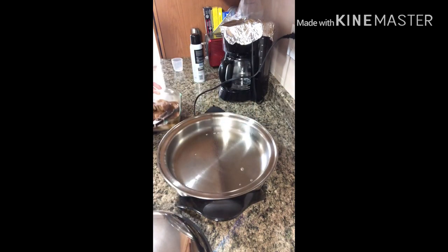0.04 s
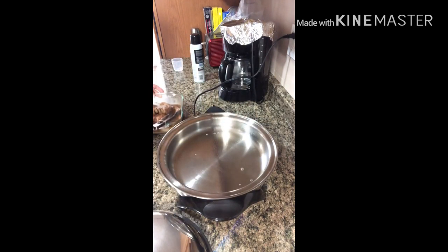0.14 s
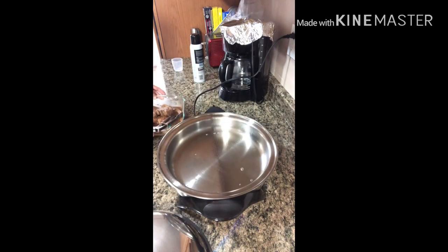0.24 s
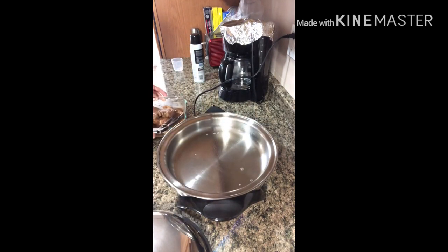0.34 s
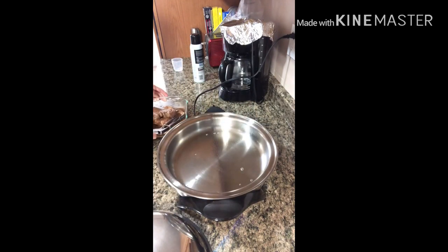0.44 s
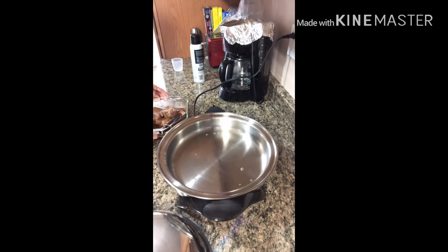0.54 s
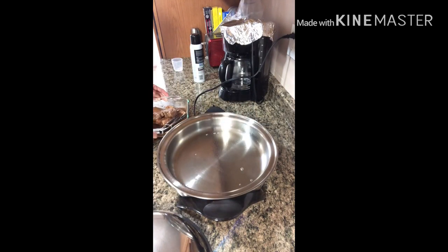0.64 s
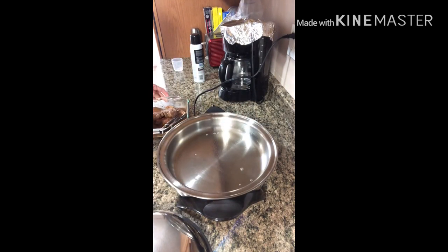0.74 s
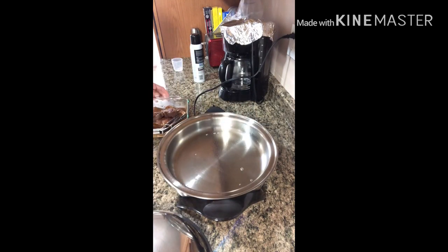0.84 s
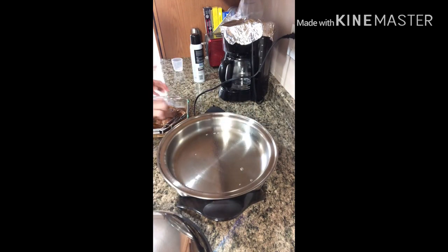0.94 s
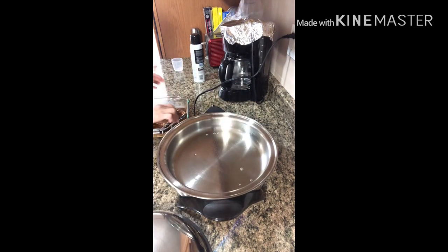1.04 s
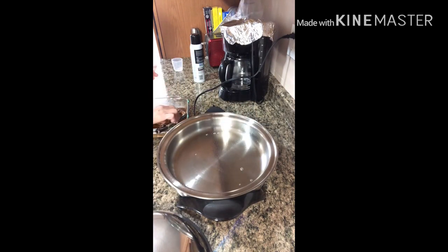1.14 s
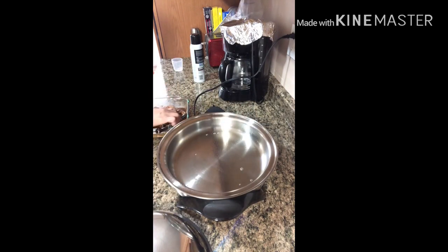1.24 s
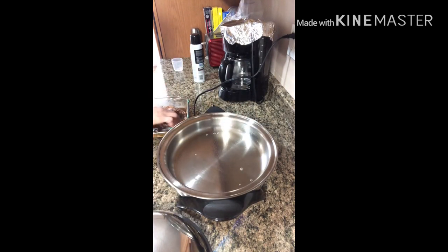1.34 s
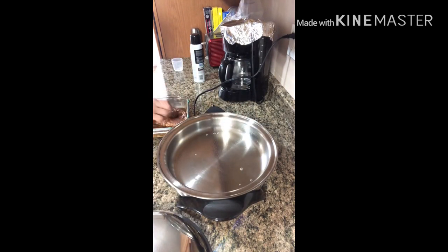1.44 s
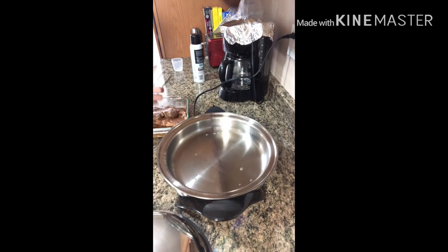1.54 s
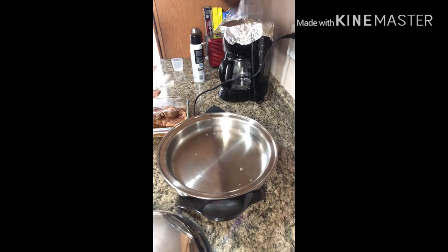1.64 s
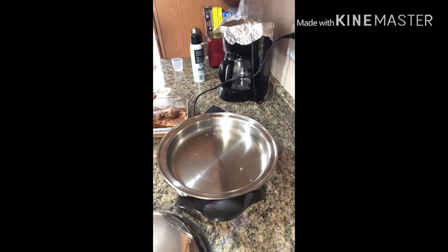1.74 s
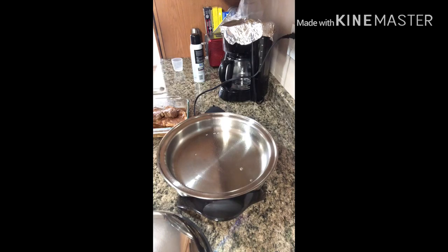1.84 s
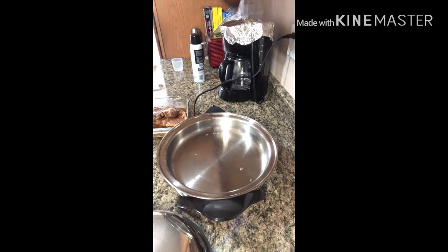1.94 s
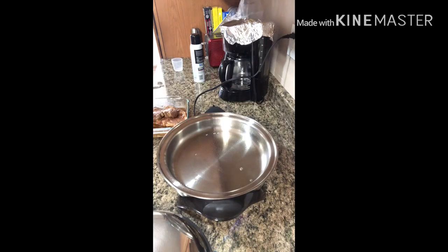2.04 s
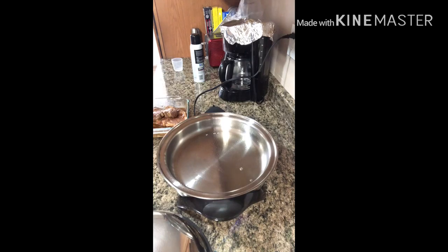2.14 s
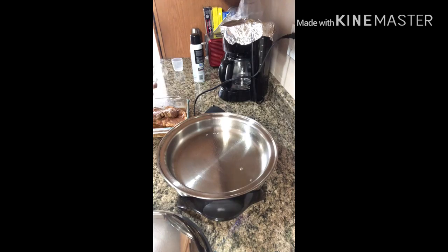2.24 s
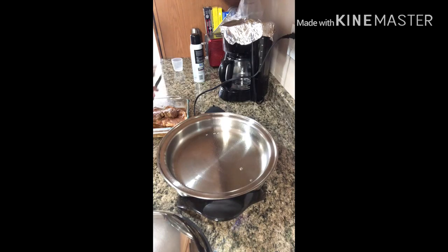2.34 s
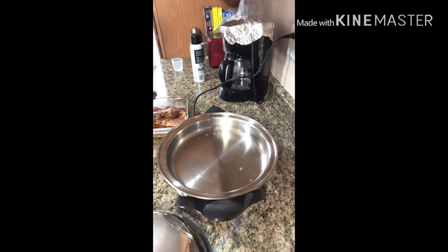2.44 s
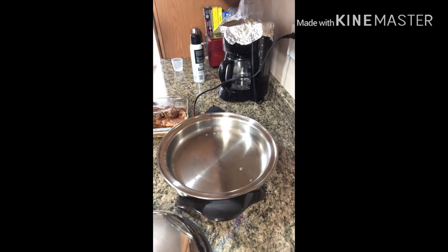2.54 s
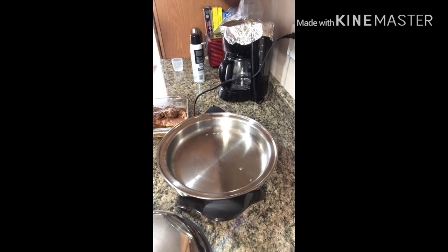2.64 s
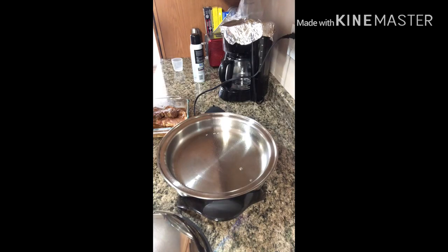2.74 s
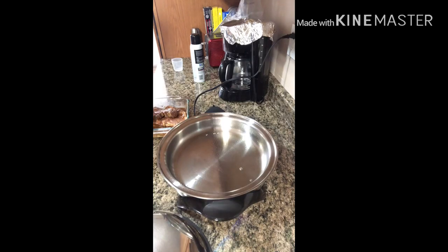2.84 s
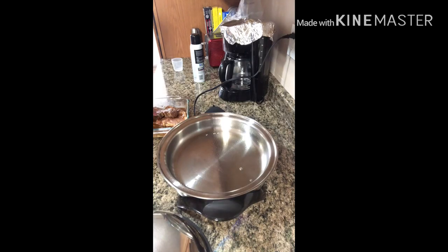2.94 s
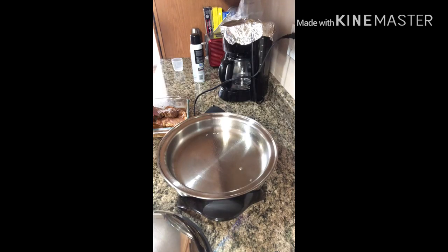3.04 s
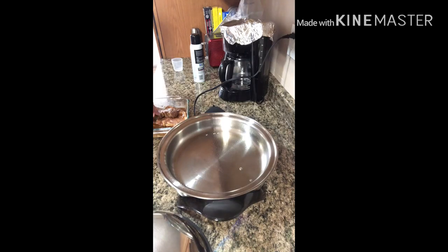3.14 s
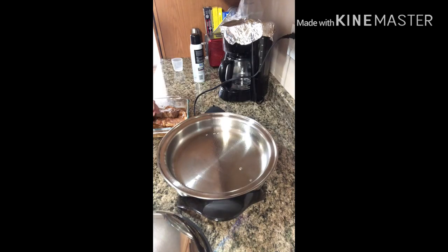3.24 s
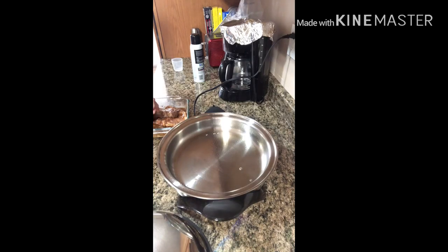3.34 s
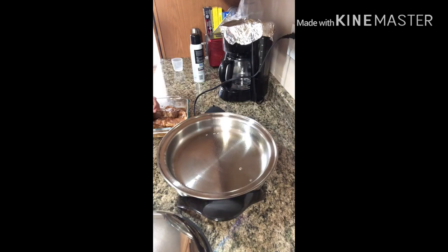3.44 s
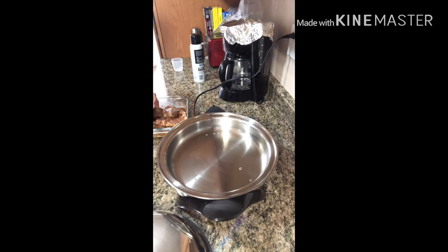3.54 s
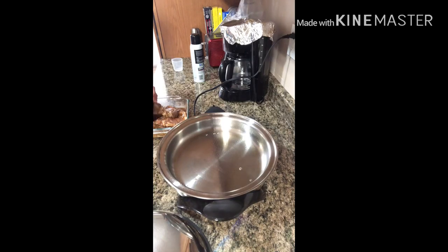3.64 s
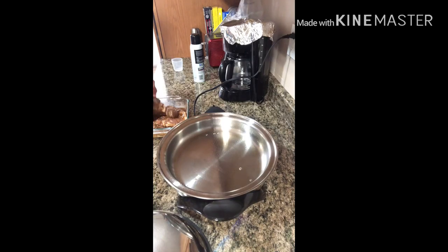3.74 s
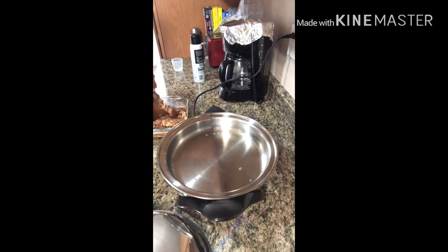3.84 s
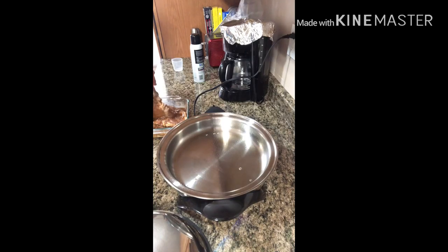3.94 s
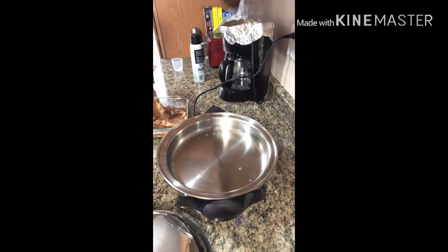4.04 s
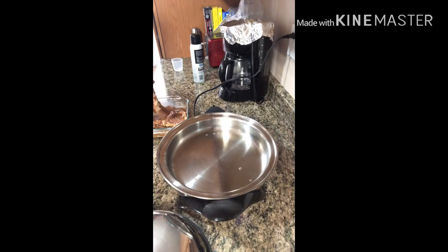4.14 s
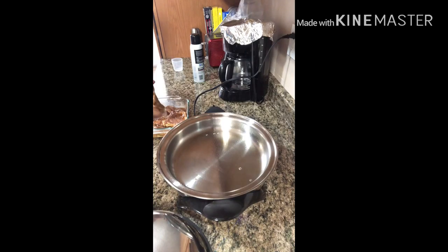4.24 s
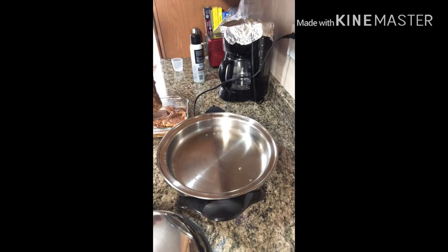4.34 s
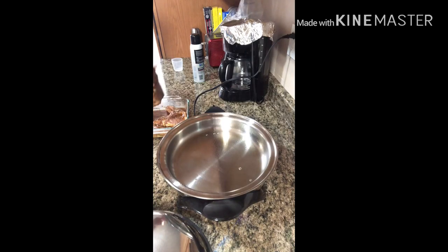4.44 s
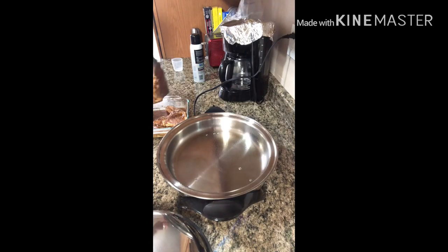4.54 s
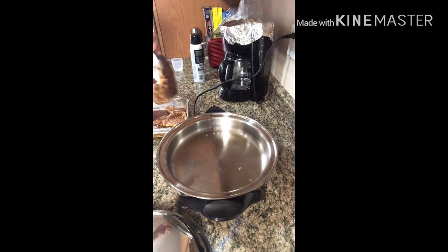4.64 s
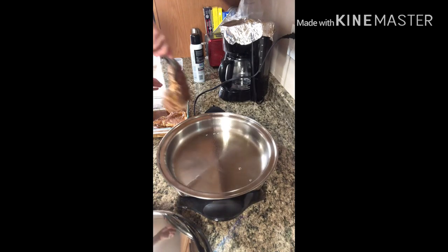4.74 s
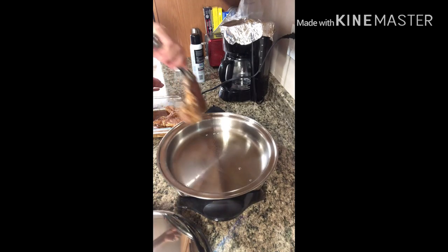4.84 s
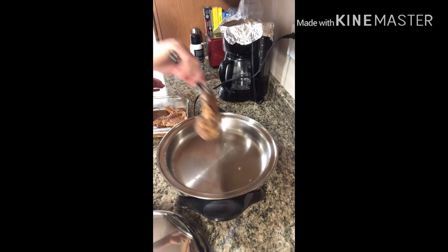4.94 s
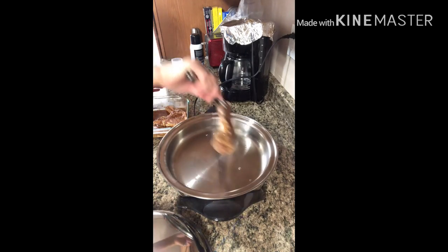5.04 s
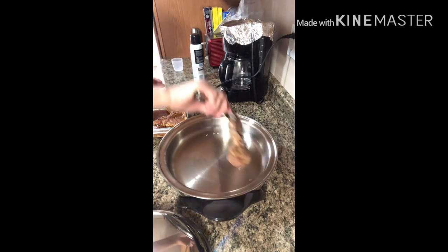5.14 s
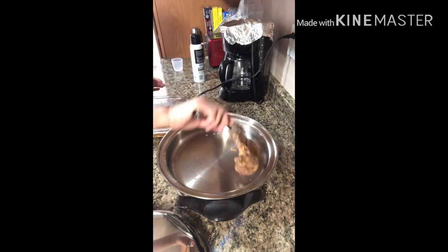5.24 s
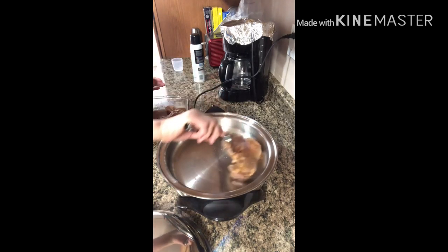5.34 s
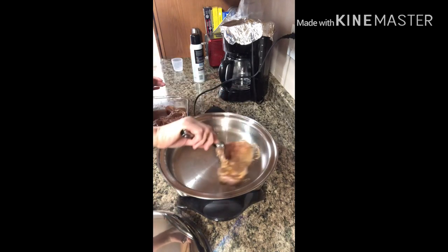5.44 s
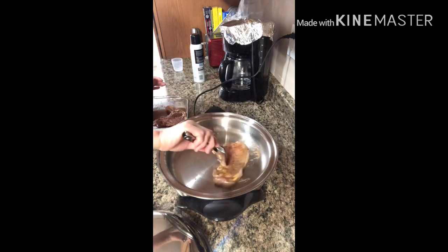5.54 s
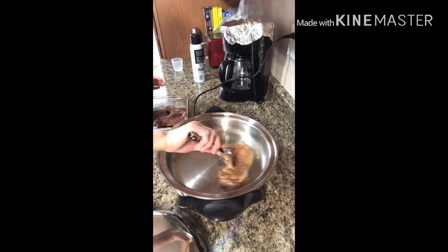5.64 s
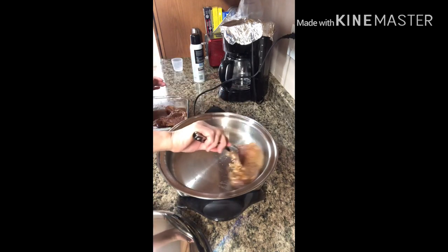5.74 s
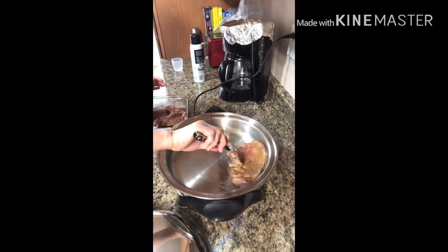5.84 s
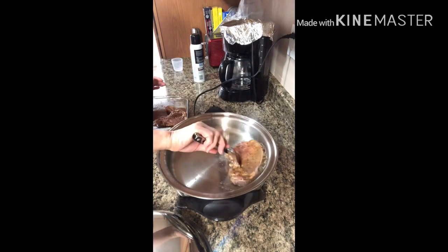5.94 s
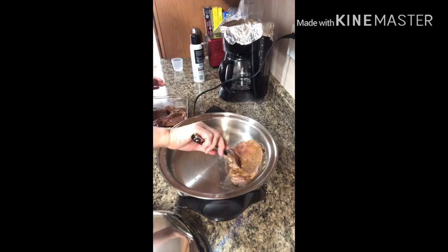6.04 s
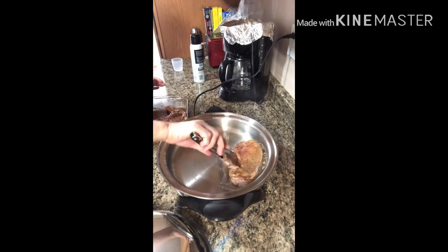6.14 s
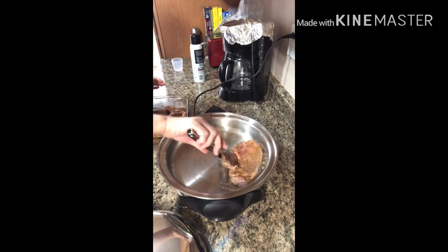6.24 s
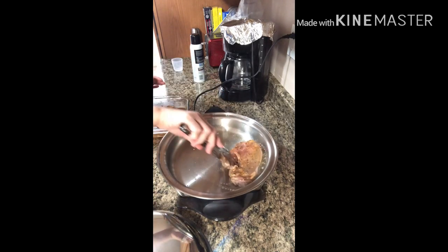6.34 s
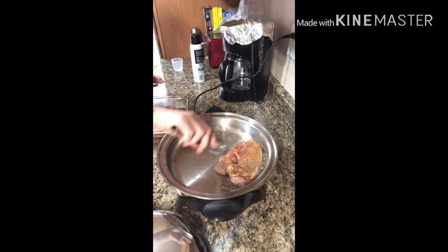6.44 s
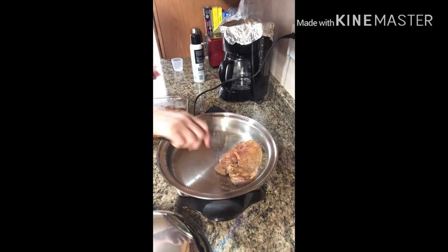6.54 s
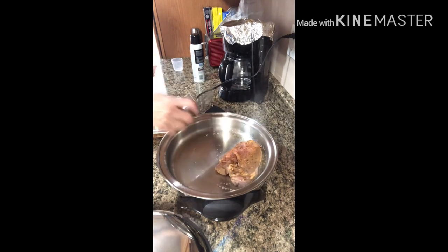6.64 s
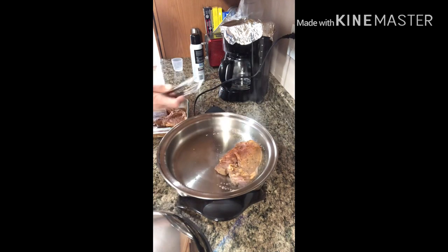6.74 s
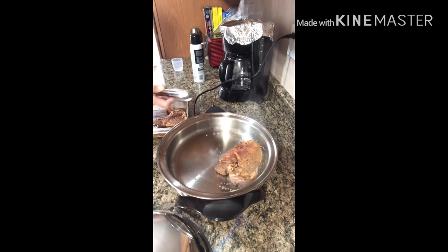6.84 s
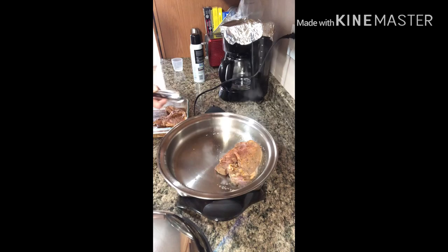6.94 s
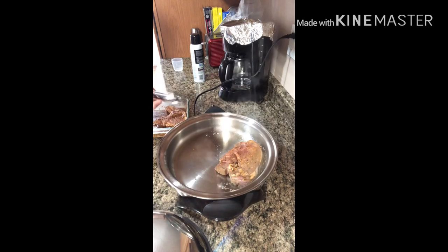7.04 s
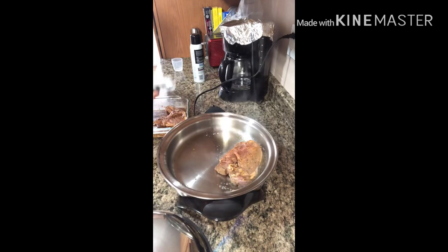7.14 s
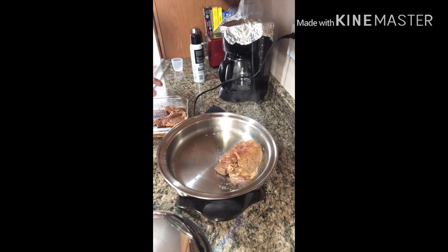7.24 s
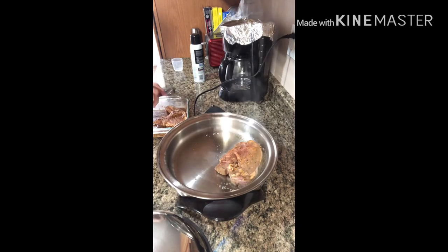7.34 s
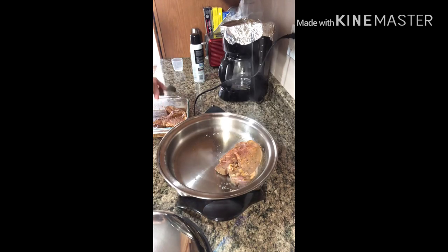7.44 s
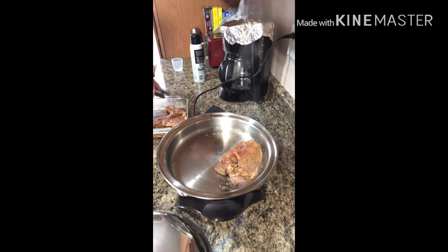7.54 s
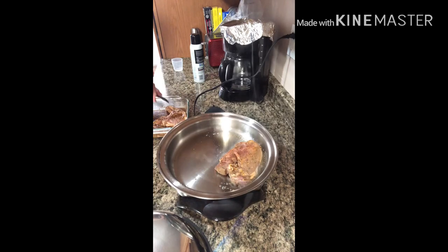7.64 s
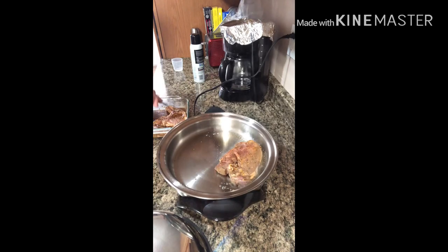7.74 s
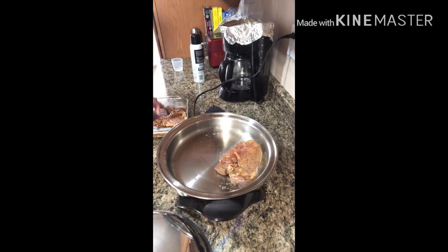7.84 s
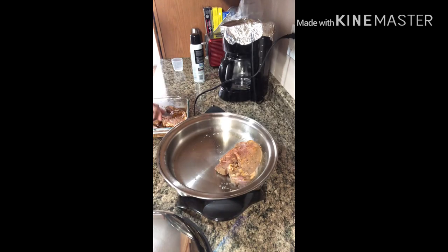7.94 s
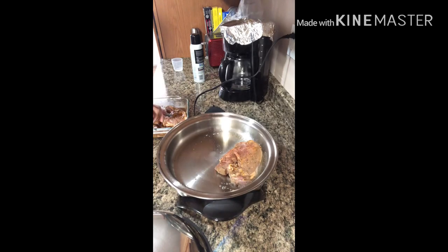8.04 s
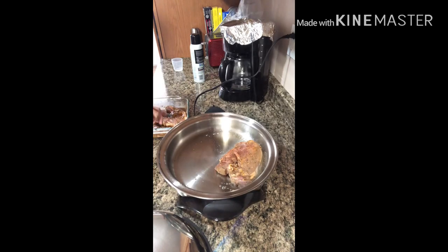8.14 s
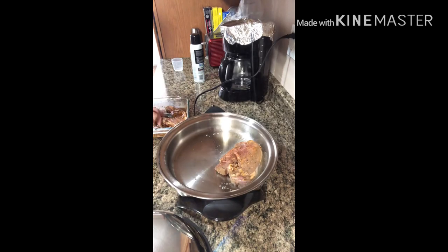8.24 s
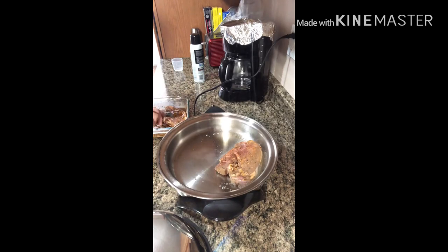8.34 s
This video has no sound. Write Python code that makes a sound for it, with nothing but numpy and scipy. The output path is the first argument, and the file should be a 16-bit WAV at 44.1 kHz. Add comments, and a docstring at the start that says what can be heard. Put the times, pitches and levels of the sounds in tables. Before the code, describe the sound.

Dull counter knocks, a dish clink and clicking steel tongs, then meat hits hot oil with a sudden, spitting sizzle.

```python
"""First come two dull knocks as things are set down on a kitchen counter, and then a dish clinks.
Steel tongs click and pick up a wet pork chop, which peels away with tiny smacks.
About five seconds in, the chop meets the oil of a hot electric skillet and sizzles: its water turns
to steam, thousands of bubbles burst and a few drops spit. An appliance hums softly throughout.
Everything is heard in mono from close above."""
import sys
import numpy as np
from scipy import signal
from scipy.fft import rfft, irfft
from scipy.io import wavfile
from scipy.ndimage import uniform_filter1d

SR = 44100
rng = np.random.default_rng(int(sys.argv[2]) if len(sys.argv) > 2 else 0)


def materialize(psi):
    """Save the field psi as 16-bit PCM at rate SR to the path in sys.argv[1].

    A 1-D psi becomes a single channel; in a 2-D psi each row is a channel.
    """
    bounded = np.clip(np.atleast_2d(psi).T, -1, 1)
    quanta = np.round(bounded * 32767).astype(np.int16)
    wavfile.write(sys.argv[1], SR, quanta)


N = 369558
TIME = np.arange(N) / SR  # seconds, for the whole scene
HIT_TIME = TIME[:SR // 2]  # half a second, for one short sound
TOP_HZ = 15900  # treble above this is cut


def sizzle(drying_start_s=6.585, waver_db=0.66):
    """Water from the meat flashes to steam in the oil; the sound eases as the underside dries."""
    # Bubble groups, coarse to fine. Each row: top of the band in Hz, relative level in dB,
    # growth time in seconds, extra flare in dB, drying loss in dB per second.
    groups = [(1557, -9, 0.043, 1, 4.5), (3500, 0, 0.031, -6, 4.2), (8280, 4.5, 0.012, -6, 4.5),
              (18600, 1.38, .004, -1.5, 4.5)]
    bands = split(frying(), [row[0] for row in groups])
    drying_s = np.maximum(TIME - drying_start_s, 0)
    layers = []
    for band, (_, db, growth_s, flare_db, loss) in zip(bands, groups):
        level_db = db - loss * drying_s + waver_db * drift(5)
        layers.append(band * boiling(growth_s, flare_db) * gain(level_db))
    layers[-1] *= gain(-2.5 * swell(5.86, 0.049))  # the finest spray dips briefly
    return sum(layers)


def frying():
    """Steam bubbles pop sharply or ring for a moment, and the pan boosts some pitches."""
    # The tone of the frying as the microphone hears it, a little duller above 8 kHz.
    # Each row: frequency in Hz, level in dB.
    heard_tone = [(40, -30), (110, -30), (180, -11), (290, -16.5), (520, -17), (900, -4), (1300, -4),
                  (1900, -2.5), (3000, -1), (5000, 0.5), (7700, -1), (8300, -4), (12000, -2.5), (16000, -3)]
    # Pitches the open pan boosts. Each row: frequency in Hz, width in Hz, boost in dB.
    pan = [(174, 77, 5.5), (362, 112, 11), (618, 170, 7), (950, 53, 0), (1100, 270, 3), (1484, 210, 3.5),
           (1887, 150, 4), (2183, 63, 4), (2560, 98, 1), (4080, 1100, 2), (4730, 200, 1.5),
           (5410, 100, 4.5)]
    crackle = pops(rate=14000, spread_db=2.5)
    bubbles = 0
    for hz in np.geomspace(300, 15000, 22):  # each bubble size has its own pitch and flurries
        ringing = unit(resonate(pops(rate=3000, spread_db=2.5), hz, hz / 6))
        flurries = gain(1.63 * drift(60) + 1.5 * drift(11))
        bubbles += ringing * np.sqrt(hz) * flurries
    fry = colour(crackle + gain(-2) * unit(bubbles), heard_tone, pan)
    return in_room(fry * gain(0.11 * drift(35)), wet_db=-15)


def boiling(growth_s, extra_flare_db):
    """Loudness over time: each wet patch of the chop meets the oil, flares up and settles."""
    # Patches landing. Each row: start in seconds, steady level in dB,
    # flare in dB relative to that level, flare time in seconds.
    landings = [(5.076, -38.5, -3.5, 0.086), (5.232, -33.5, -7, .1), (5.402, -31.5, 4.5, 0.11),
                (5.485, -33, 7, 0.17)]
    power = 0
    for start, db, flare_db, flare_s in landings:
        age = np.maximum(TIME - start, 0)
        steady = gain(db) * (1 - np.exp(-age / growth_s))
        flare = gain(flare_db + extra_flare_db) ** 2 * np.exp(-age / flare_s)
        power += steady ** 2 * (1 + flare)
    return np.sqrt(power)


def steam():
    """Trapped steam sings briefly as it is squeezed from under the chop."""
    # Steam jets. Each row: peak time and half-length in seconds, pitch and width in Hz, level in dB.
    jets = [(5.535, 0.072, 5040, 900, -23.5), (5.553, 0.11, 2610, 220, -30.5),
            (5.77, 0.079, 1770, 500, -31.5), (5.868, 0.055, 1100, 240, -32)]
    out = np.zeros(N)
    for peak_s, half_s, hz, width, db in jets:
        hiss = cut(pops(rate=4000, spread_db=-0.5), [hz - width / 2, hz + width / 2], "band")
        out += gain(db) * swell(peak_s, half_s) * unit(hiss)
    return out


def spits():
    """Single drops explode in the oil with a snap."""
    # Each row: start in seconds, level in dB, pitch in Hz, width in Hz, fade time in seconds.
    drops = [(5.605, -22, 5000, 1200, 0.007), (5.6377, -16, 4200, 2000, 0.0046),
             (6.728, -23.5, 5000, 4000, .003), (8.0734, -20.5, 5500, 12000, 0.013),
             (8.3098, -22.5, 13500, 3500, 0.0033)]
    out = np.zeros(N)
    for start, db, hz, width, fade_s in drops:
        snap = cut(resonate(burst(fade_s), hz, width), TOP_HZ)
        add(out, start, gain(db) * unit_hit(snap))
    return in_room(out, wet_db=-9)


def knocks(lag_s=0.00588):
    """A blow sends a thud through the countertop; its heavy body rings a moment later."""
    # Each row: start in seconds, level in dB, treble cutoff in Hz,
    # body level in dB relative to the thud, pitch of the struck spot in Hz.
    blows = [(0.3866, -29.5, 440, -0.5, 215), (0.5447, -21, 1390, -1.5, 990), (3.3966, -35, 820, -5, 800),
             (6.491, -44.5, 225, 6, 181)]
    # The tone of the thud. Each row: frequency in Hz, level in dB.
    tone = [(60, -20), (160, -7), (280, -2.5), (430, 3.5), (780, -0.5), (1100, -3), (1600, -0.5),
            (2300, -3.5), (2900, -3), (4500, -3.5), (9000, -4), (15000, -6)]
    # How the board dies away. Each row: frequency in Hz, fade time in seconds.
    decays = [(150, 0.11), (700, 0.077), (1600, 0.051), (4000, 0.029)]
    # Notes of counter and cupboard. Each row: pitch in Hz, level in dB, fade time in seconds.
    notes = [(87, -6, 0.11), (126, 0, 0.085), (168, 3, 0.067), (232, -1, 0.087), (330, -10, 0.12),
             (382, -6.5, 0.19), (416, -3, 0.059), (510, -11, 0.1), (605, -12, 0.12), (728, -7.5, 0.14)]
    out = np.zeros(N)
    for start, db, cutoff_hz, body_db, spot_hz in blows:
        shudder = gain(-1) * unit_hit(damped(decays)) * (1 - fade(0.01))
        board = unit_hit(bending_wave(lag_s)) + shudder
        board = colour(board, tone, boosts=[(spot_hz, 0.4 * spot_hz, 5)])
        thud = unit_hit(cut(board, cutoff_hz))
        body = unit_hit(cut(ring(notes), [70, cutoff_hz], "band"))
        add(out, start, gain(db) * thud)
        add(out, start + lag_s, gain(db + body_db) * body)
    return in_room(out, wet_db=-8.5)


def bending_wave(lag_s, at_hz=150):
    """A tap travels through a board: the pitch at_hz takes lag_s, and lower ones take longer."""
    hz = np.arange(len(HIT_TIME) // 2 + 1) * SR / len(HIT_TIME)
    return irfft(np.exp(-4j * np.pi * lag_s * np.sqrt(at_hz * hz)), len(HIT_TIME))


def tongs():
    """At each grip one arm of the tongs lands and the other follows."""
    # Each row: start in seconds, level in dB, treble cutoff in Hz,
    # the second arm's delay in seconds, its level in dB relative to the first.
    grips = [(1.89, -61.5, 5000, .021, 1.5), (2.1558, -41, 14000, .0304, -4), (2.367, -60, 4000, .004, -4),
             (2.4004, -43, 9000, .0376, -6), (2.4843, -52, 8550, .0134, 2),
             (2.563, -28.5, 16000, .0076, -1), (3.1901, -51.5, 4200, .004, -7),
             (3.4381, -48.5, 11900, .004, -18)]
    out = np.zeros(N)
    for start, db, cutoff_hz, lag_s, second_db in grips:
        add(out, start, gain(db) * steel_click(cutoff_hz))
        add(out, start + lag_s, gain(db + second_db) * steel_click(cutoff_hz))
    return in_room(out, wet_db=-9.5)


def steel_click(cutoff_hz):
    """A thin steel arm is struck and rings faintly, a little differently each time."""
    # The tone of the click. Each row: frequency in Hz, level in dB.
    tone = [(300, -26), (1300, -25.5), (2300, -12), (2850, -1), (3800, 0), (5500, -4.5), (9500, -3.5),
            (12500, 2.5), (16000, 2.5)]
    # Notes of the steel. Each row: pitch in Hz, level in dB, fade time in seconds.
    notes = [(2730, 6, 0.14), (3370, 6, 0.04), (3610, 9, 0.046), (4900, -11, .1), (6950, 3, 0.086),
             (7550, -1, 0.15), (9300, -2, .08), (11850, -1, 0.065), (12900, 4, 0.096), (13450, -6, .1),
             (14950, -4.5, .08)]
    varied = [(hz, db + 2.9 * rng.standard_normal(), fade_s) for hz, db, fade_s in notes]
    click = unit_hit(colour(burst(fade_s=0.048), tone))
    ringing = gain(-18) * unit_hit(ring(varied))
    return unit_hit(cut(click + ringing, cutoff_hz))


def clinks():
    """The tongs bump the dish and set it ringing; a softer touch gives fewer high notes."""
    # Each row: start in seconds, level in dB, treble cutoff in Hz, rise time in seconds.
    touches = [(1.0966, -36, 6540, 0.00092), (1.307, -40, 1910, 0.0016)]
    # Notes of the dish. Each row: pitch in Hz, level in dB, fade time in seconds.
    notes = [(380, -11, 0.12), (497, -7, 0.07), (939, -2.5, 0.13), (974, 5.5, 0.031), (1320, 0, 0.061),
             (1390, -9.5, 0.15), (2060, -1, 0.031), (2306, 2, 0.04), (2730, -4, 0.06), (2820, -2, 0.028),
             (3360, -2, 0.031), (3710, -0.5, 0.038), (4260, -3, 0.039), (4500, -11, .08), (4910, -6, 0.054),
             (5520, -11, 0.082), (6000, -5, 0.04), (6750, -8, .06), (7800, -17, .05), (11300, -14, .05),
             (11830, -7, .06), (13100, -10, .04)]
    out = np.zeros(N)
    for start, db, cutoff_hz, rise_s in touches:
        ringing = unit_hit(ring(notes))
        clatter = gain(-2) * unit_hit(cut(burst(fade_s=0.039), 900, "high"))
        clink = (ringing + clatter) * (1 - np.exp(-HIT_TIME / rise_s))
        add(out, start, gain(db) * unit_hit(cut(clink, cutoff_hz)))
    return in_room(out, wet_db=-7)


def meat():
    """Films of marinade snap as the chop is peeled up and dragged softly over the dish."""
    # The louder wet smacks. Each row: start in seconds, level in dB, pitch in Hz.
    smacks = [(3.238, -57, 13900), (3.2749, -61, 9550), (3.597, -60, 10200), (3.6296, -60, 5950),
              (3.7638, -62, 7840), (3.907, -61, 13200), (3.954, -61, 3540), (4.1359, -68, 13500),
              (4.2656, -67, 13600)]
    drag = cut(pops(rate=1300, spread_db=2.5), 640, "high")
    drag = unit(cut(drag, 1900, order=1))
    peel = unit(cut(pops(rate=120, spread_db=4), 5000, "high"))
    out = gain(-69) * swell(3.83, 0.18) * drag + gain(-77) * swell(3.66, 0.38) * peel
    for start, db, hz in smacks:
        snap = cut(burst(fade_s=0.029), [2500, 2 * hz], "band")
        add(out, start, gain(db) * unit_hit(resonate(snap, hz, hz / 4)))
    return in_room(out, wet_db=-6)


def background():
    """Room air rumbles softly under the slightly wavering hum of an appliance."""
    # The tone of the air. Each row: frequency in Hz, relative level in dB.
    tone = [(15, -55), (25, -27), (36, -9), (64, 0), (123, -5.5), (166, -4), (185, -11.5), (242, -10.5),
            (363, -18), (394, -22), (427, -13), (545, -21.5), (591, -21.5), (1400, -29.5), (16000, -44)]
    # Notes of the hum. Each row: pitch in Hz, level in dB.
    notes = [(80.7, -66), (118.4, -59), (161.5, -62.5), (242.2, -66), (360.7, -69), (425.3, -62.5),
             (473.7, -69.5), (597.5, -77.5)]
    air = cut(colour(rng.standard_normal(N), tone), 47.4, "high", order=4)
    air = gain(-56 + 0.5 * drift(2.66)) * unit(air)
    hum = 0
    for hz, db in notes:
        loudness = gain(db + 0.47 * drift(1.66))
        hum += loudness * np.sin(2 * np.pi * hz * TIME + 0.5 * drift(9.4))
    return air + hum


def in_room(x, wet_db, build_s=0.0037):
    """Add the kitchen's wash of echoes, wet_db relative to the direct sound."""
    # How the echoes die away. Each row: frequency in Hz, fade time in seconds.
    decays = [(100, 0.42), (700, 0.49), (2000, 0.46), (5000, 0.36), (13000, 0.19)]
    tail = damped(decays) * (1 - np.exp(-(HIT_TIME / build_s) ** 2))
    tail /= np.sqrt(np.sum(tail ** 2))
    return x + gain(wet_db) * signal.fftconvolve(x, tail)[:N]


def pops(rate, spread_db):
    """Random tiny clicks, about rate a second; spread_db sets how much their sizes vary."""
    size = gain(spread_db * np.minimum(rng.exponential(size=N), 6))
    return unit((rng.random(N) < rate / SR) * size * rng.choice([-1, 1], N))


def ring(notes):
    """The fading notes of a struck object, each starting up or down at random."""
    return sum(rng.choice([-1, 1]) * gain(db) * fade(fade_s) * np.sin(2 * np.pi * hz * HIT_TIME)
               for hz, db, fade_s in notes)


def burst(fade_s):
    """A puff of noise that dies away."""
    return rng.choice([-1, 1], len(HIT_TIME)) * fade(fade_s)


def damped(decays):
    """A puff of noise whose low and high bands fade at their own speeds."""
    edges = np.geomspace(50, SR / 2.2, 9)
    return sum(cut(burst(look_up(decays, np.sqrt(low * high))), [low, high], "band")
               for low, high in zip(edges, edges[1:]))


def fade(fade_s):
    """A curve that falls by 60 dB in the fade time."""
    return np.exp(-np.log(1000) * HIT_TIME / fade_s)


def swell(peak_s, half_s):
    """A bell-shaped rise and fall around peak_s."""
    return np.exp(-((TIME - peak_s) / half_s) ** 2)


def drift(rate):
    """A smooth random wander of about 1, turning rate times a second."""
    step = int(SR / rate)
    stairs = np.repeat(rng.standard_normal(N // step + 1), step)
    return unit(uniform_filter1d(stairs, step)[:N])


def colour(x, tone, boosts=()):
    """Shape a sound with a tone curve, plus optional boosts around single pitches."""
    size = 8192
    hz = np.arange(size // 2 + 1) * SR / size
    peaks_db = sum(db / (1 + (2 * (hz - centre) / width) ** 2) for centre, width, db in boosts)
    cepstrum = irfft(np.log(gain(look_up(tone, hz) + peaks_db)))
    # Folding onto the first half keeps the filter from ringing before the sound arrives.
    cepstrum[1:size // 2] *= 2
    cepstrum[size // 2 + 1:] = 0
    response = irfft(np.exp(rfft(cepstrum)))[:size // 2]
    return signal.fftconvolve(x, response)[:len(x)]


def cut(x, hz, keep="low", order=2):
    """Keep the part below hz ("low"), above it ("high") or between two values ("band")."""
    sections = signal.butter(order, np.minimum(hz, SR / 2.1), keep, fs=SR, output="sos")
    return signal.sosfilt(sections, x)


def resonate(x, hz, width):
    """Let a sound ring at one pitch; a narrower width rings longer."""
    peak = signal.iirpeak(min(hz, SR / 2.2), hz / min(width, SR / 3), fs=SR)
    return signal.lfilter(*peak, x)


def split(x, edges):
    """Divide a sound into equally strong bands, one up to each edge in Hz."""
    hz = np.arange(N // 2 + 1) * SR / N
    spectrum = rfft(x)
    below = [0] + [1 / (1 + (hz / edge) ** 24) for edge in edges]
    return [unit(irfft(spectrum * (high - low), N)) for low, high in zip(below, below[1:])]


def look_up(points, hz):
    """Read between (Hz, value) points, with octaves evenly spaced."""
    known_hz, values = np.transpose(points)
    return np.interp(np.log(hz + 1), np.log(known_hz), values)


def gain(db):
    """Turn decibels into a multiplier."""
    return 10 ** (np.asarray(db) / 20)


def unit(x):
    """Scale to an average strength (rms) of 1."""
    return x / np.sqrt(np.mean(x ** 2))


def unit_hit(x):
    """Scale a blow to strength 1 over its first hundredth of a second."""
    return x / np.sqrt(np.mean(x[:SR // 100] ** 2))


def add(track, start_s, x):
    """Mix a sound into a track at start_s."""
    i = int(start_s * SR)
    track[i:i + len(x)] += x[:max(N - i, 0)]


def scene():
    """All sources at one microphone, the same in both channels."""
    mono = sizzle() + steam() + spits() + knocks() + clinks() + tongs() + meat() + background()
    return np.array([mono, mono])


def record(dry):
    """Clip at full scale and cut the highest treble."""
    treble_cut = signal.ellip(12, 0.1, 80, TOP_HZ, fs=SR, output="sos")
    return signal.sosfilt(treble_cut, np.clip(dry, -1, 1))


dry = scene()
out = record(dry)
materialize(out)
```